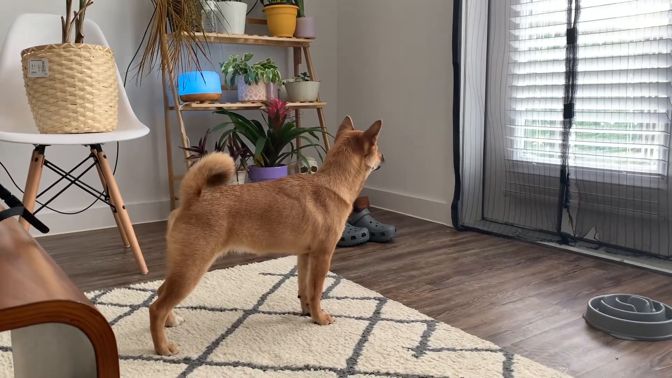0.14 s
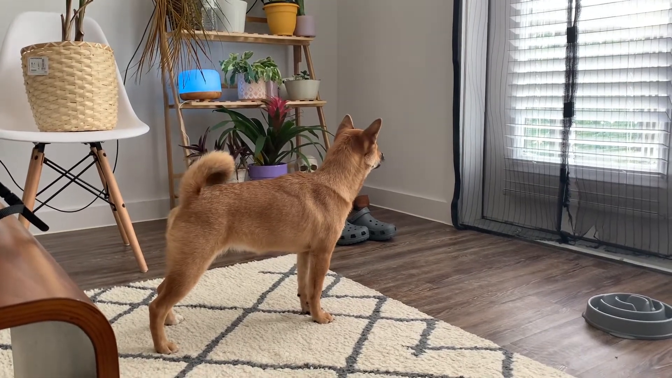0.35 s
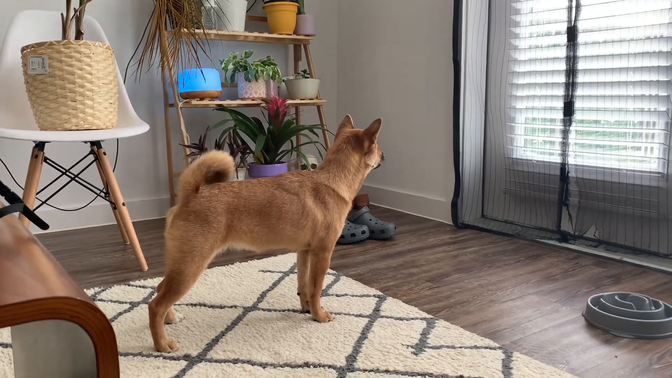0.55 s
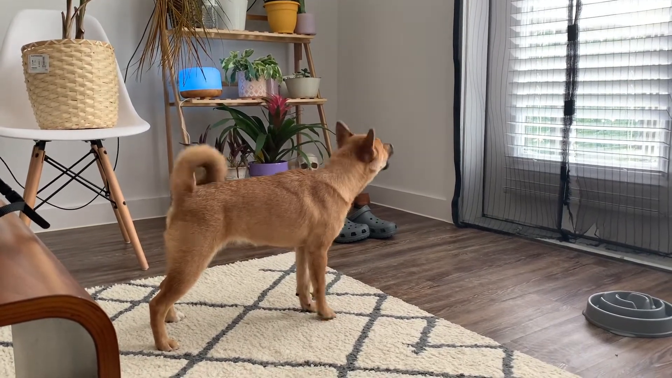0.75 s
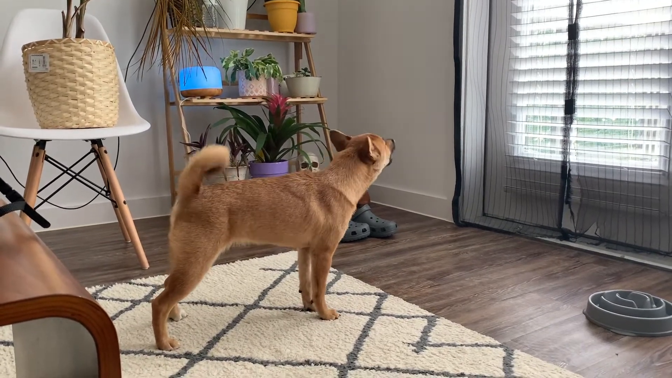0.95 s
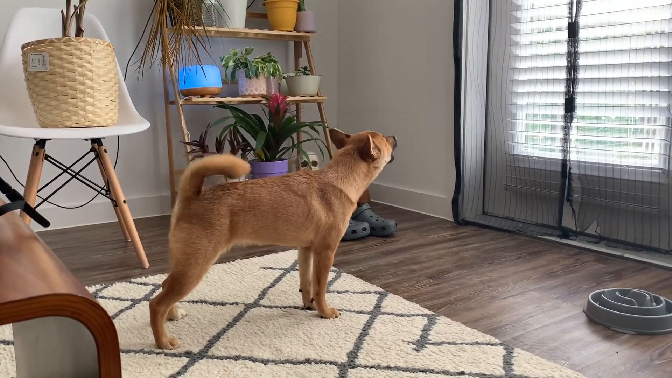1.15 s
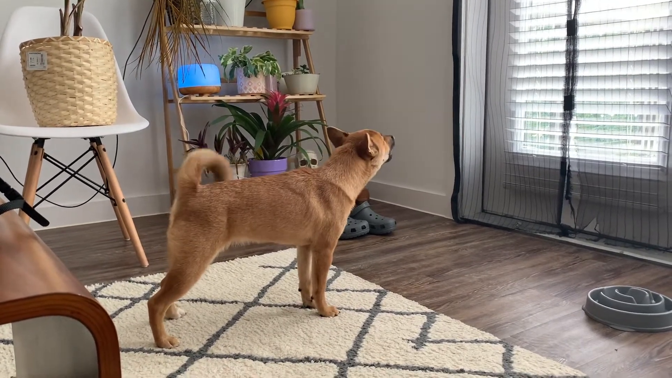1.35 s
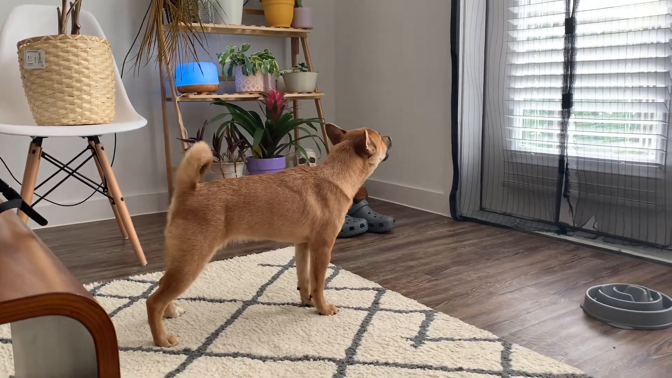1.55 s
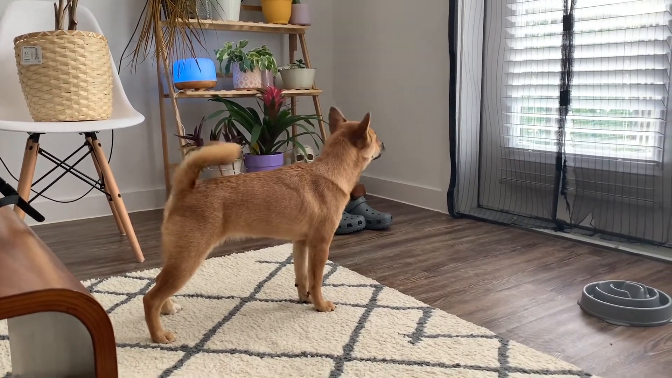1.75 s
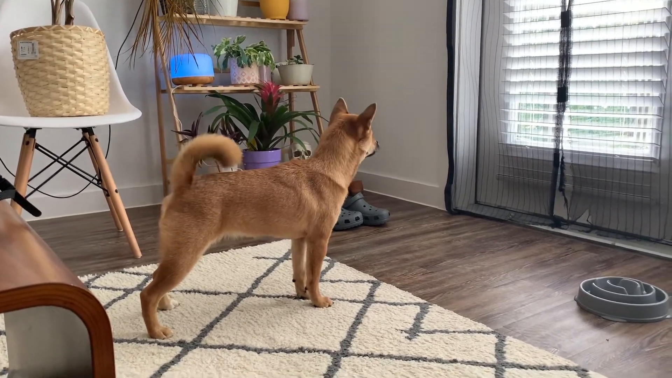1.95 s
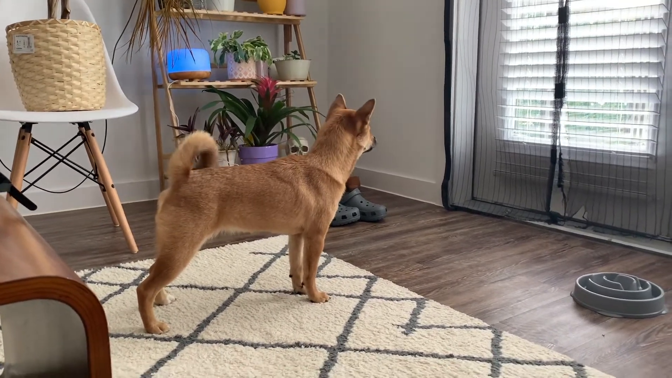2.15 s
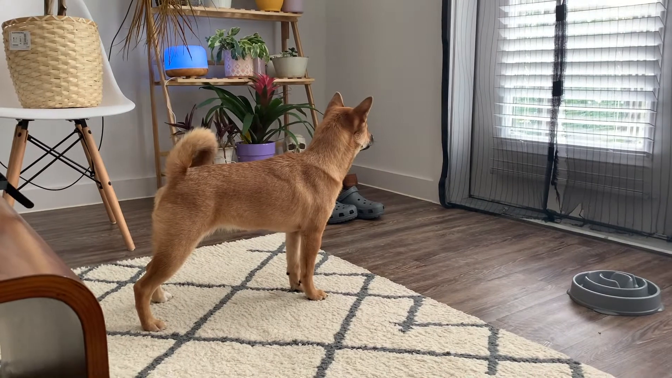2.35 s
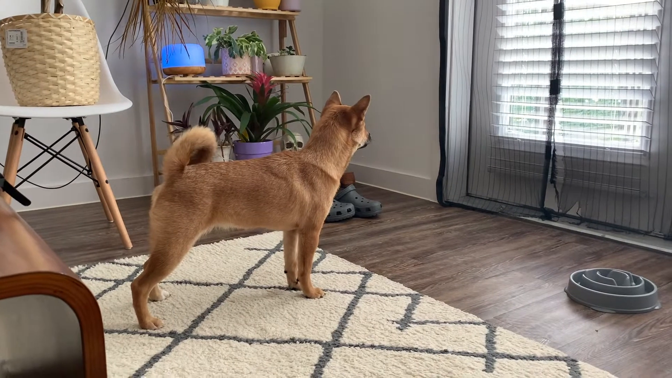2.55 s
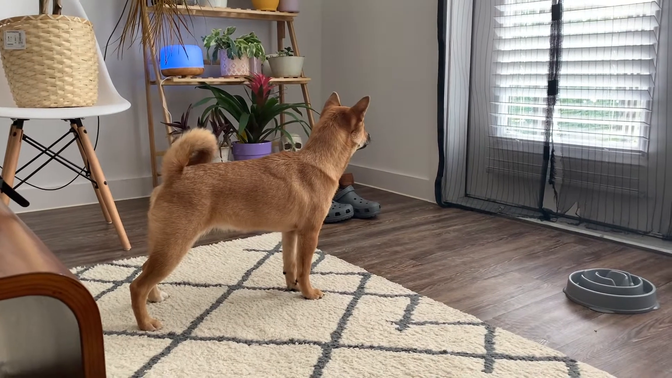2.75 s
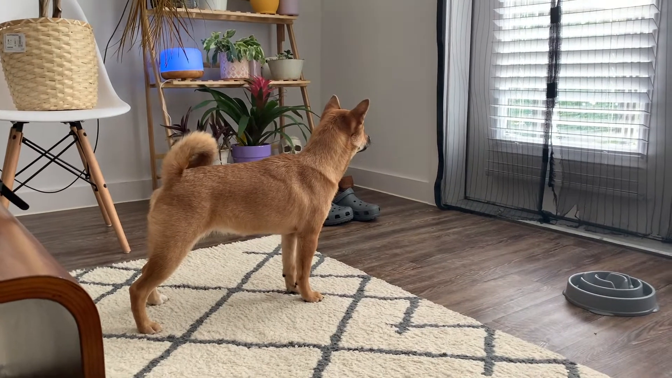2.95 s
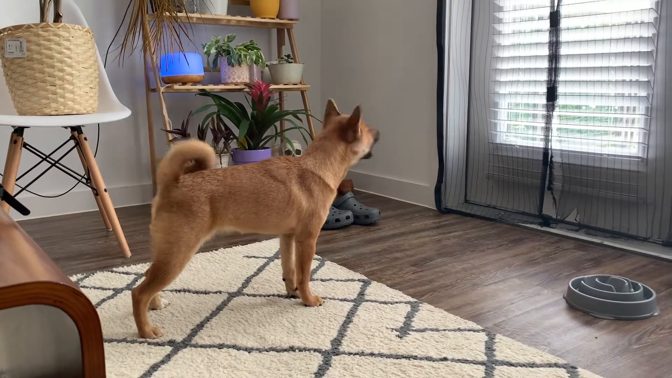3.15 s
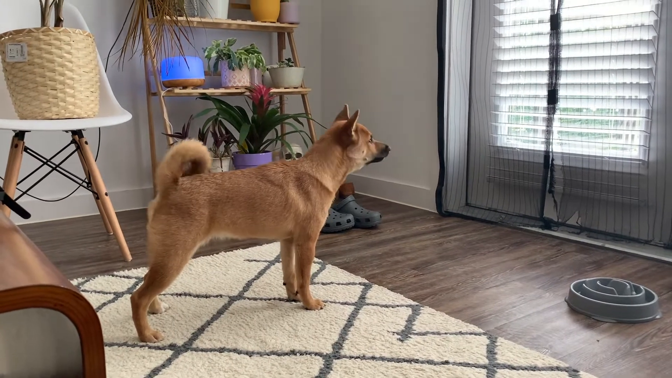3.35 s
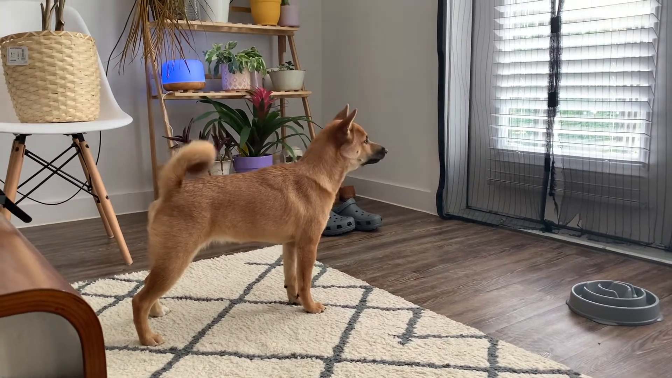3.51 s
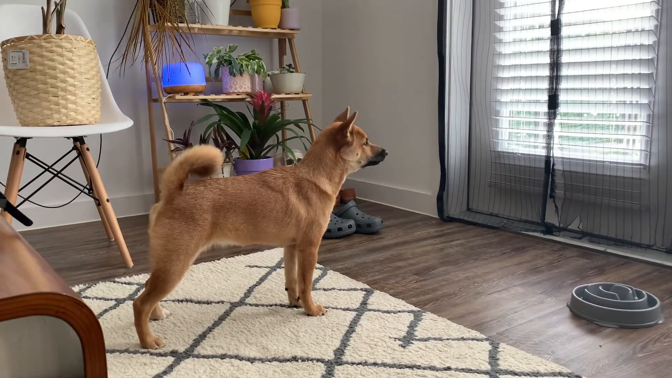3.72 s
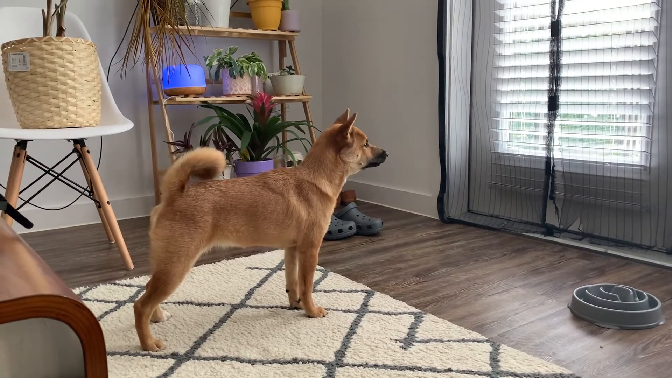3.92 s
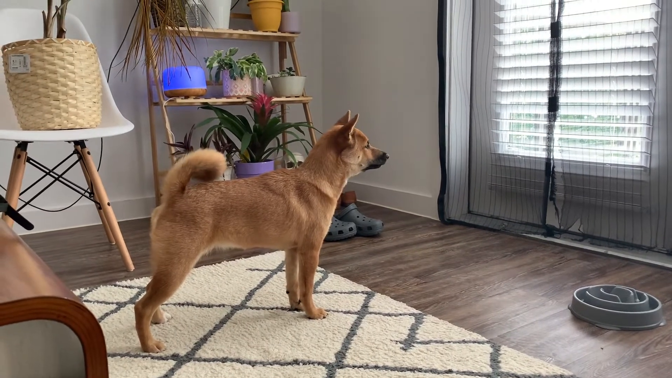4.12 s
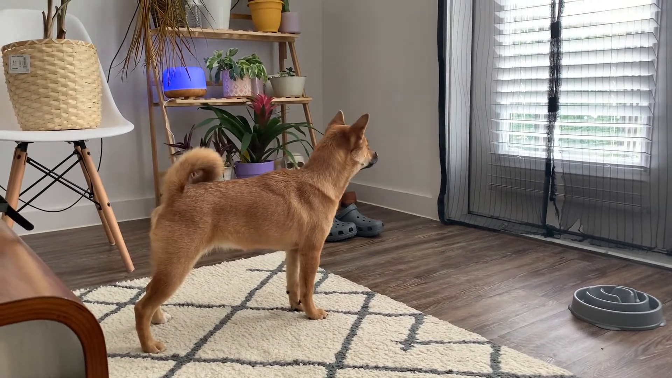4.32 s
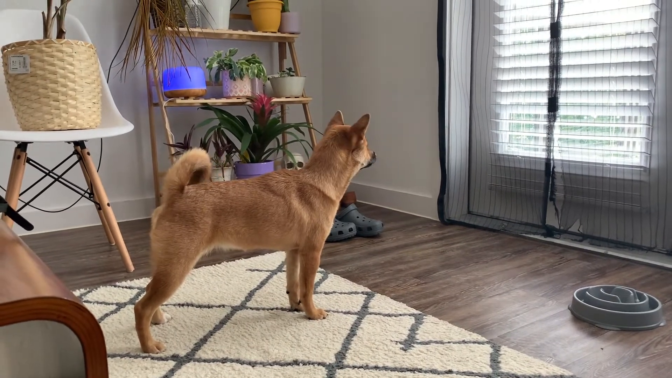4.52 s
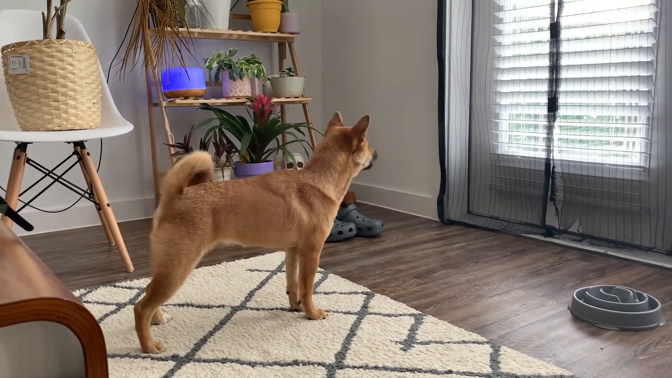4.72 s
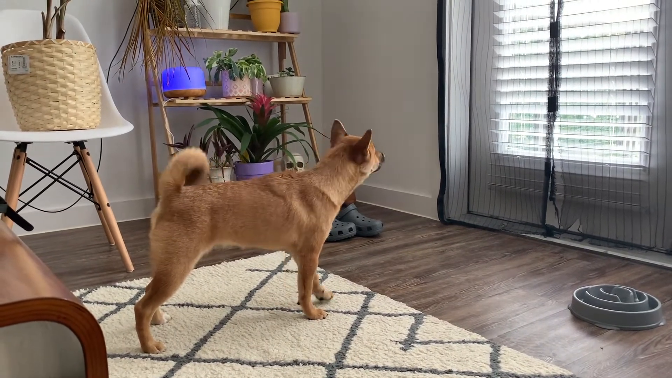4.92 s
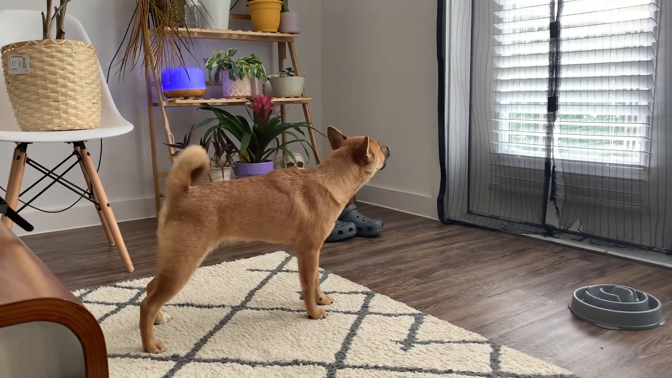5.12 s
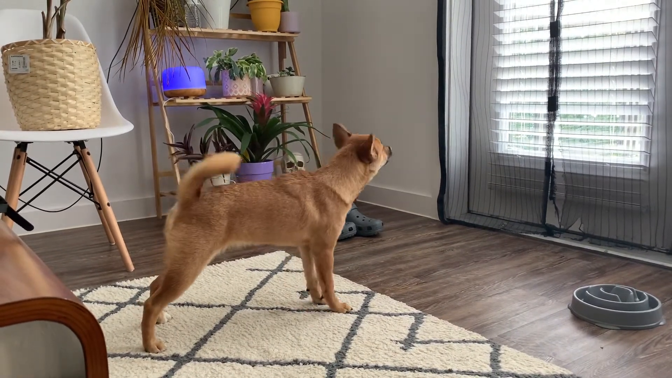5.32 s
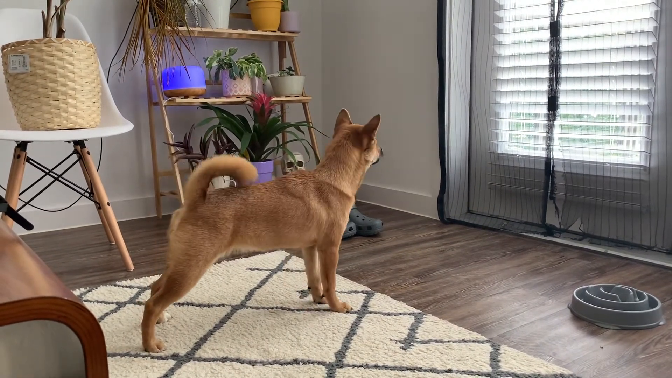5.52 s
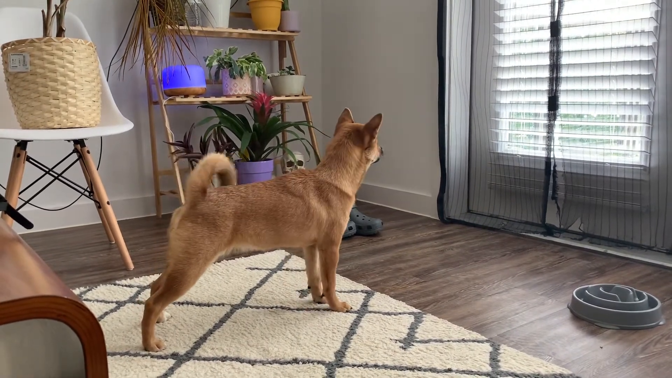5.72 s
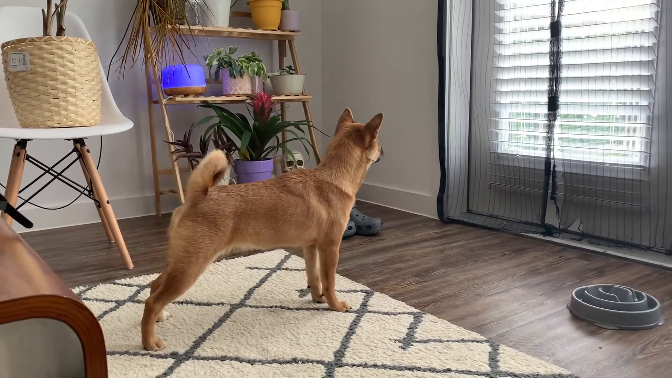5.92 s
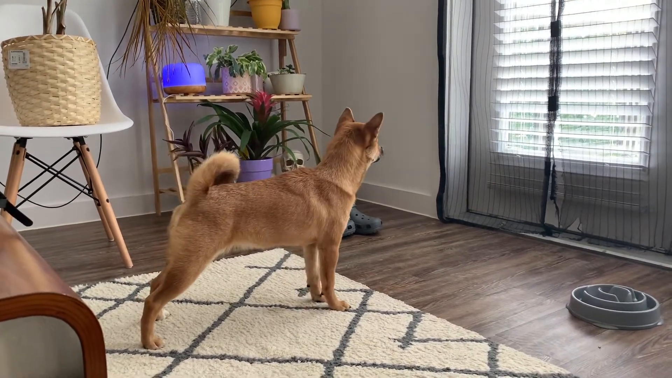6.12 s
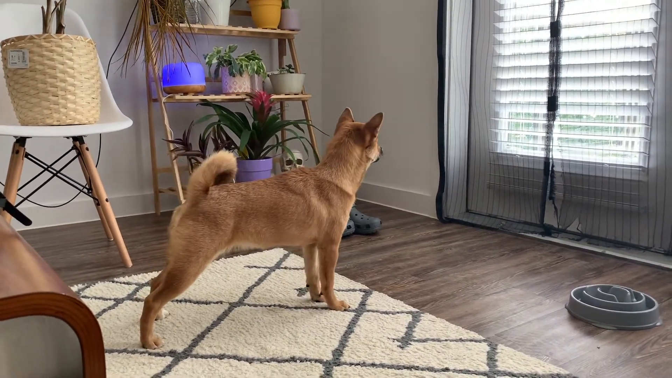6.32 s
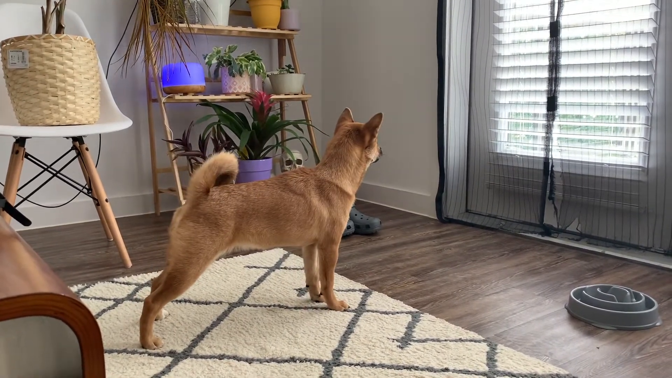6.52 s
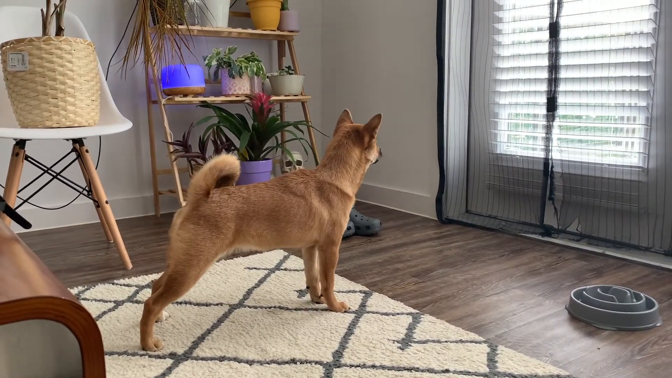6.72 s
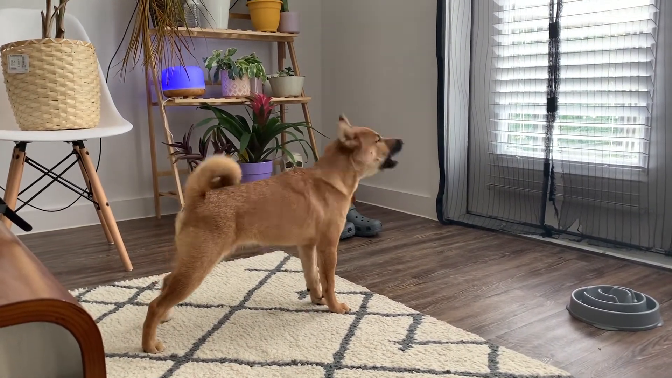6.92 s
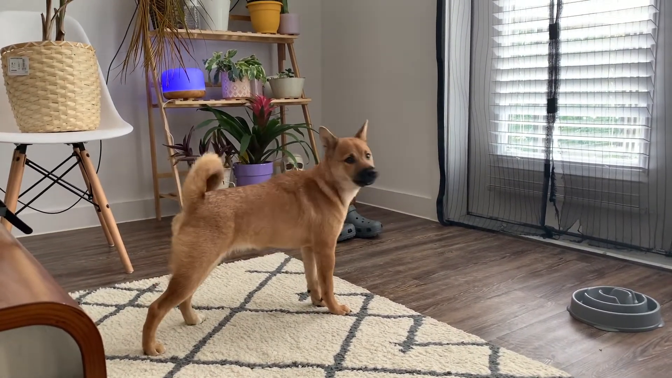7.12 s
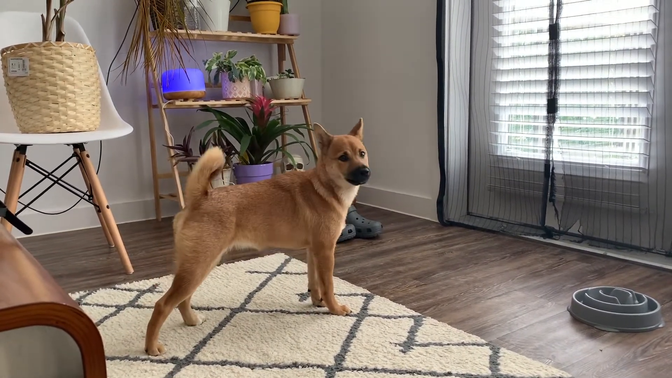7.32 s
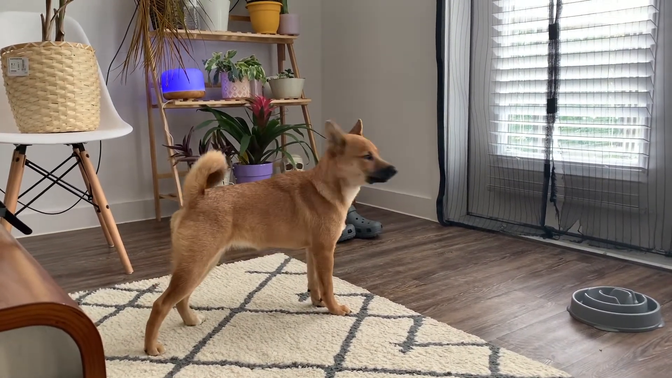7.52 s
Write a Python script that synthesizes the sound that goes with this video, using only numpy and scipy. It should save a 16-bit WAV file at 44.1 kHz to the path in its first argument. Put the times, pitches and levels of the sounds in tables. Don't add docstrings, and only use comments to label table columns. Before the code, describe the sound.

Quiet household hum, then a rough young bark leaps into a yelp and settles into a smooth howl that sags out of breath. A lone bark, a quick group of three and a last rising bark follow, widely spaced, ending in a tiny closed-mouth grumble. Soft paw pads touch the boards, low thuds come through the building, and a thin far whine wavers. Phone microphone a few steps away, lively room echo.

```python
import sys
import numpy as np
from scipy import signal
from scipy.fft import rfft, irfft, next_fast_len
from scipy.io import wavfile
from scipy.ndimage import uniform_filter1d, map_coordinates

SR = 44100
rng = np.random.default_rng(int(sys.argv[2]) if len(sys.argv) > 2 else 0)


def boost(x):
    u = np.asarray(x, float) / 20
    return 10 ** u


def log_audio(samples):
    frames = np.atleast_2d(samples).T
    limited = np.clip(frames, -1, 1)
    pcm = np.round(limited * 32767).astype(np.int16)
    wavfile.write(sys.argv[1], SR, pcm)


N = 333396

REST_HZ, SILENT_DB = 409.7, -85
ROUGH_PUFF, ROUGH_SETTLED, ROUGH_SLUMP = .2, .27, .36


def unit(x):
    return x / np.sqrt(np.mean(x ** 2) + 1e-20)


def along(points, hz):
    f, v = np.transpose(points)
    return np.interp(np.log(hz + 1), np.log(f + 1), v)


def curves(rows):
    s, *cols = np.transpose(rows)
    t = np.arange(N) / SR
    return [np.interp(t, s, c) for c in cols]


def wobble(rate):
    knots = rng.standard_normal(int(N * rate / SR) + 4)
    return map_coordinates(knots, [np.arange(N) * rate / SR])


def humps(rows):
    t = np.arange(N) / SR
    return sum(db * np.cos(np.pi / 2 * np.clip((t - s) / half, -1, 1)) ** 2 for s, half, db in rows)


def filtered(x, response):
    m = next_fast_len(x.shape[-1] + 8192)
    spectrum = rfft(x, m) * response(np.fft.rfftfreq(m, 1 / SR))
    return irfft(spectrum, m)[..., :x.shape[-1]]


def coloured(x, spectrum):
    size = 4096
    wanted = boost(along(spectrum, np.fft.rfftfreq(size, 1 / SR)))
    cep = irfft(np.log(wanted), size)
    cep[1:size // 2] *= 2
    cep[size // 2 + 1:] = 0
    response = irfft(np.exp(rfft(cep)), size)[:size // 2]
    return signal.fftconvolve(x, response)[:N]


def spread(pair, alike):
    def turn(hz):
        return np.arccos(np.clip(along(alike, hz), -1, 1)) / 2
    mid, side = filtered(pair, lambda hz: np.array([np.cos(turn(hz)), np.sin(turn(hz))]))
    return np.array([mid + side, mid - side])


def silence(s):
    return (s, REST_HZ, SILENT_DB, -1, 1, ROUGH_PUFF)


def bark(s, db, hold, end_hz, mouth):
    puff_hz, peak_hz = 455, 514.1
    end = s + .078 + hold
    rough = .57 + .0012 * abs(end_hz - peak_hz)
    return [silence(s),
            (s + .015, puff_hz, -38.5, -1.6, 1, ROUGH_PUFF),
            (s + .032, puff_hz, db - 18, .85, 1, ROUGH_PUFF * 2),
            (s + .052, puff_hz, db - 4.5, 2, 1, rough),
            (s + .078, peak_hz, db, mouth, 1, rough),
            (end, end_hz, db - 8, mouth - .1, .9, rough - .1),
            (end + .033, end_hz, db - 25, .3, .8, ROUGH_SLUMP),
            (end + .033 + .04, REST_HZ, -45, -.7, 1, ROUGH_PUFF)]


def yelp(s, db, hz, hold, rough):
    over, settled_mouth, settled_doubling = 1.06, .049, .31
    return [(s - .056 / 2, hz * .84, db - 7.5, .3, 1, rough / 2),
            (s, hz * over, db, .94, .85, rough),
            (s + hold * .55, hz * (1 + over) / 2, db - 3, .65, .42, rough * .8),
            (s + hold, hz, db - 3, settled_mouth, settled_doubling, ROUGH_SETTLED),
            (s + hold + .012, hz, db - 21.5, settled_mouth, settled_doubling, ROUGH_SETTLED)]


# time_s, pitch_hz
HOWL_PITCH = [(.99, 715), (1.03, 685), (1.07, 672), (1.12, 677), (1.19, 645), (1.25, 639), (1.57, 629),
              (1.61, 618), (1.645, 596)]
# time_s, level_db
HOWL_LEVEL = [(1.0, -22), (1.045, -29), (1.14, -19.5), (1.19, -27.5), (1.25, -26), (1.32, -27.5),
              (1.45, -27), (1.61, -25.5), (1.645, -20.5)]


def howl():
    mouth, doubling, rough_held, clearing_s = .086, .034, .05, .1
    pitch_s, pitch_hz = np.transpose(HOWL_PITCH)
    effort_s, effort_db = np.transpose(HOWL_LEVEL)
    rows = []
    for s in np.union1d(pitch_s[1:], effort_s):
        rough = rough_held + (ROUGH_SETTLED - rough_held) * np.exp((effort_s[0] - s) / clearing_s)
        rows.append((s, np.interp(s, pitch_s, pitch_hz), np.interp(s, effort_s, effort_db),
                     mouth, doubling, rough))
    return rows


def slump(s, length, hz, db):
    low_hz, drop_db, mouth = 418.9, -15, -.307
    return [(s, hz, db, .3, .2, ROUGH_SETTLED),
            (s + length / 4, (hz + low_hz) / 2, db + drop_db / 2, mouth, .6, ROUGH_SLUMP),
            (s + length, low_hz, db + drop_db, 2 * mouth, .7, ROUGH_SLUMP),
            (s + length + .045, low_hz, SILENT_DB, -1, 1, ROUGH_SLUMP)]


def grumble(s, attack, length, hz, db, fade_db):
    return [(s, hz * .93, SILENT_DB, -.8, .2, ROUGH_SLUMP),
            (s + attack, hz * .93, db, -.85, .12, ROUGH_SLUMP),
            (s + length / 2, hz * 1.06, db + fade_db / 2, -.4, .4, ROUGH_SLUMP),
            (s + length, hz, db + fade_db, -.7, .3, ROUGH_SLUMP)]


# start_s, peak_effort_db, hold_s, closing_rate_hz, mouth (0 shut to 2 wide)
BARKS = [
    (.672, -11, .04, 590, 1.18),
    (3.112, -15, .085, 510.2, 1.945),
    (4.706, -13.5, .075, 455, 1.96),
    (6.872, -15, .05, 702, 2.04),
]
# peak_s, peak_effort_db, settled_rate_hz, hold_s, roughness (0-1)
YELPS = [
    (.937, -19, 701, .055, .65),
    (5.007, -12, 705, .088, .75),
    (5.169, -19.5, 686.5, .056, .42),
]
# start_s, length_s, first_rate_hz, first_effort_db
SLUMPS = [
    (1.661, .1, 559.5, -28.5),
    (5.243, .05, 642.4, -30.5),
]
# start_s, attack_s, length_s, rate_hz, effort_db, fade_db
GRUMBLE = (7.41, .025, .145, 435, -45, -10)


def calls():
    def hush(rows):
        return rows[:-1] + [silence(rows[-1][0])]
    one, two, three, four = [bark(*row) for row in BARKS]
    into_howl, second, third = [yelp(*row) for row in YELPS]
    held, last = [slump(*row) for row in SLUMPS]
    howling = one + into_howl[:-1] + howl() + held
    run_of_three = three + second + third + last
    return sorted(howling + hush(two) + run_of_three + hush(four) + grumble(*GRUMBLE))


def fold_pulses(rate, cycles, doubling, rough):
    count = np.arange(1, int(cycles[-1]))
    at = np.interp(count, cycles, np.arange(N))
    sample = at.astype(int)
    strong = 1 + (-1.) ** count * np.clip(doubling[sample], 0, 1)
    scatter = boost(3 * rough[sample] * wobble(400)[sample])
    taps = sample[:, None] + np.arange(-7, 9)
    away = taps - at[:, None]
    sinc = np.sinc(away) * np.cos(np.pi * away / 16) ** 2
    weights = sinc * (strong * scatter)[:, None]
    pulses = np.bincount(np.clip(taps, 0, N - 1).ravel(), weights.ravel(), N)
    return pulses * SR / rate / np.sqrt(2)


# freq_hz, level_db
LIPS = [(60, -40.5), (130, -8.5), (250, 2.5), (420, 3), (600, -11), (1000, -15.5), (1500, -26.5),
        (2500, -35.5), (4000, -48.5), (8000, -75)]
# freq_hz, level_db
SHUT = [(100, -50.5), (300, -32), (450, -9.5), (680, 2), (1000, -10.5), (1280, -25), (1600, -40.5),
        (1950, -19), (2550, -36.5), (3500, -52), (5100, -40.5), (5900, -72.5), (9000, -70), (13000, -64.5)]
# freq_hz, level_db
HALF = [(130, -42), (450, -22.5), (700, 1), (880, -6), (1080, 4), (1420, -28), (1800, -18), (2150, -14.5),
        (2800, -35), (3400, -55.5), (4050, -35), (4600, -47.5), (5300, -42), (8000, -58.5)]
# freq_hz, level_db
WIDE = [(130, -37), (350, -22.5), (500, -21.5), (620, -2.5), (790, 1), (980, -11.5), (1280, -2.5),
        (1850, -19), (2280, -9.5), (2800, -30.5), (3400, -39), (4100, -33.5), (4650, -44.5), (5400, -31.5),
        (8000, -57)]


def through_mouth(folds, mouth):
    place = np.clip(mouth, -1, 2) + 1
    voice = np.zeros(N)
    for k, shape in enumerate([LIPS, SHUT, HALF, WIDE]):
        share = np.clip(1 - abs(place - k), 0, 1)
        voice += coloured(folds * share, shape)
    return filtered(voice, lambda hz: 1 / np.sqrt(1 + (110 / (hz + 1)) ** 8))


# freq_hz, level_db
TEETH = [(4000, -47), (6800, -29), (7800, -6), (8700, 2), (9800, 3), (11200, 4.5), (12500, -1), (13600, -6),
         (14500, -16.5), (15800, -25)]


def breath(pulses, rate, rough):
    buzz = 1.3 * (1 - rough) * pulses * np.sqrt(2 * rate / SR)
    gusts = boost(2.9 * wobble(25)) * rng.standard_normal(N)
    return unit(coloured(gusts + buzz, TEETH))


# centre_s, half_width_s,
# level_db
CATCHES = [(1.004, .011, 11), (1.014, .008, -13), (1.027, 0.015, 11), (5.064, .012, 3.5),
           (5.078, .011, -13), (5.092, .011, 0), (5.208, 0.033, 10), (6.926, .022, -2.5), (6.968, .032, 4)]


def dog():
    rate, effort_db, mouth, doubling, rough = curves(calls())
    effort_db = effort_db + humps(CATCHES)
    jitter = .00246 * wobble(40) + .15 * rough ** 2 * wobble(150)
    cycles = np.cumsum(rate * (1 + jitter)) / SR
    pulses = fold_pulses(rate, cycles, doubling, rough)
    gate = unit(3.9 + np.cos(np.pi * cycles))
    turbulence = gate * rng.standard_normal(N) * np.sqrt(SR / 2 / rate)
    folds = boost(effort_db) * (np.sqrt(1 - rough ** 2) * pulses + rough * turbulence)
    hiss_db = -34 + 4 * np.clip(mouth, -1, 2)
    return through_mouth(folds, mouth) + boost(effort_db + hiss_db) * breath(pulses, rate, rough)


# start_s, peak_db
PAWS = [
    (2.044, -45),
    (5.619, -54),
]


def paws():
    out, t = np.zeros(N + SR), np.arange(2000) / SR
    for s, db in PAWS:
        start = round(s * SR)
        out[start:start + len(t)] += boost(db - 60 * t / .027) * rng.standard_normal(len(t))
    return coloured(out[:N], [(100, -6.5), (400, 4), (1500, -4), (4000, -39)])


# freq_hz, t60_s
ROOM = [(150, 0.48), (600, 0.69), (2500, 0.67), (5000, 0.6), (10000, .36)]
# freq_hz, likeness (0-1)
ROOM_ALIKE = [(100, 1), (300, 1), (700, 0.057), (4000, 0.046), (5300, 0.13), (7000, 0.32), (8000, 0.77),
              (11500, 1), (13500, .93), (15500, .8)]


def room(x):
    wet = np.zeros((2, N))
    edges = (np.array([0, 2.6, 4.4, 6.4, N / SR]) * SR).astype(int)
    for a, b in zip(edges, edges[1:]):
        hz, t, z = signal.stft(rng.standard_normal((2, SR)), SR, nperseg=256)
        decay = boost(-60 * t / along(ROOM, hz)[:, None])
        tail = signal.istft(z * decay, SR, nperseg=256)[1]
        build_up = 1 - np.exp(-np.arange(tail.shape[1]) / SR / .0015)
        tail = spread(tail * build_up, ROOM_ALIKE)
        tail /= np.linalg.norm(tail[0])
        call = np.pad(x[a:b], (150, N))[None, :N - a]
        wet[:, a:] += signal.fftconvolve(call, tail, axes=1)[:, :N - a]
    return wet


# freq_hz, density_db (per Hz)
HUM = [(15, -42.5), (25, -12.5), (49, -16.5), (101, -2.5), (173, -5), (204, 0.5), (233, -5.5), (410, -5.5),
       (582, -17), (848, -13.5), (970, -14), (1200, -16), (3630, -29), (7300, -47), (15500, -66.5)]
# freq_hz, likeness (0-1)
HUM_ALIKE = [(60, 1), (180, 0.9), (550, 0.066), (5000, 0.0049), (8000, 0.14), (15000, .6)]


def hum():
    z = signal.stft(rng.standard_normal((2, N)), nperseg=512)[2]
    field = rng.standard_normal(z.shape[1:])
    field = uniform_filter1d(uniform_filter1d(field, 4, 0), 10, 1)
    patchy = signal.istft(z * boost(1.2 * unit(field)), nperseg=512)[1][:, :N]
    level_db = -58.5 + 3.5 * (np.arange(N) < .75 * SR)
    return boost(level_db) * unit(filtered(spread(patchy, HUM_ALIKE), lambda hz: boost(along(HUM, hz))))


# centre_s, half_width_s, level_db (over the rumble)
THUDS = [(.29, .25, 10), (.73, .09, -5), (1.52, .18, 8), (2.22, .2, 17), (2.65, 0.077, 5), (3.6, .11, 26),
         (3.73, 0.084, 21), (3.87, 0.083, 8.5), (4.03, 0.19, 18.5), (4.22, 0.087, 9.5), (4.39, .09, 13.5),
         (4.6, 0.14, 11), (5.0, .08, 6), (5.18, .1, 8)]


def rumble():
    colour = [(20, -27), (40, -5), (65, -3.5), (95, -9), (140, -38), (300, -89.5)]
    low = spread(rng.standard_normal((2, N)), [(60, .92)])
    low = unit(filtered(low, lambda hz: boost(along(colour, hz))))
    return boost(-71.5 + humps(THUDS) + 2.6 * wobble(12)) * low


# centre_s, half_width_s, level_db
WHINE = [
    (0.0, 1.18, 8.5),
    (4.6, 1.1, 7.5),
    (6.3, 1.1, 3.5),
]


def whine():
    hz = 808 + 14 * wobble(.95) + 4 * wobble(7.9)
    level_db = -81.5 + humps(WHINE) + 2.8 * wobble(5.6)
    return np.sqrt(2) * boost(level_db) * np.sin(2 * np.pi * np.cumsum(hz) / SR)


def scene():
    near = dog() + paws()
    direct = boost(-.5) * near * boost([[-.4], [.4]])
    walls = boost(-2.5) * room(near)
    return direct + walls + hum() + rumble() + whine()


def roll_off(x):
    return signal.sosfilt(signal.butter(12, 15890, fs=SR, output="sos"), x)


# freq_hz, left_minus_right_db
SHADOW = [(3000, 0), (4400, -0.5), (5400, -6), (6300, 2), (7000, 0)]
# freq_hz, right_lead_rad
PHASE = [(700, -.2), (1400, .4), (2100, 1), (2700, .6), (4000, -.5), (5200, -2.8), (5900, -3.9),
         (6600, -6.3), (7200, -5.5), (7700, -3.4), (8600, -3.1), (10700, -.1), (11400, .4), (13100, 3),
         (14100, 3.2), (15500, 6.2)]


def record(dry):
    def apart(hz):
        half = boost(along(SHADOW, hz) / 2) * np.exp(-.5j * along(PHASE, hz))
        return half ** np.array([[1], [-1]])
    ports = filtered(dry, lambda hz: apart(hz) / np.sqrt(1 + (45 / (hz + 1)) ** 6))
    rounded = ports / (1 + abs(ports / .97) ** 10) ** (1 / 10)
    return roll_off(rounded)


dry = scene()
out = record(dry)
log_audio(out)
```